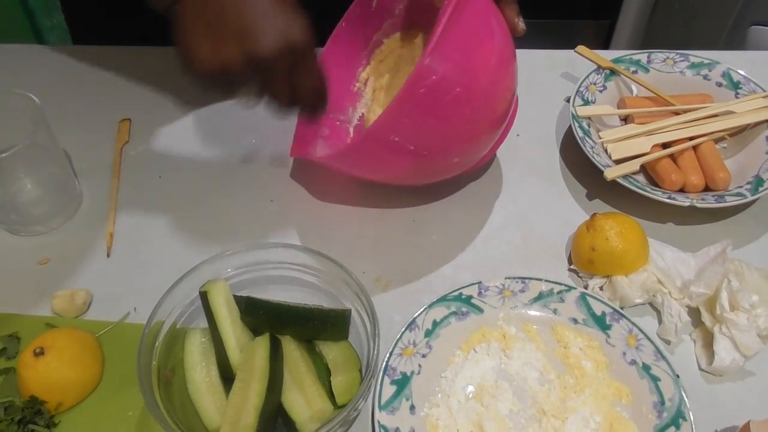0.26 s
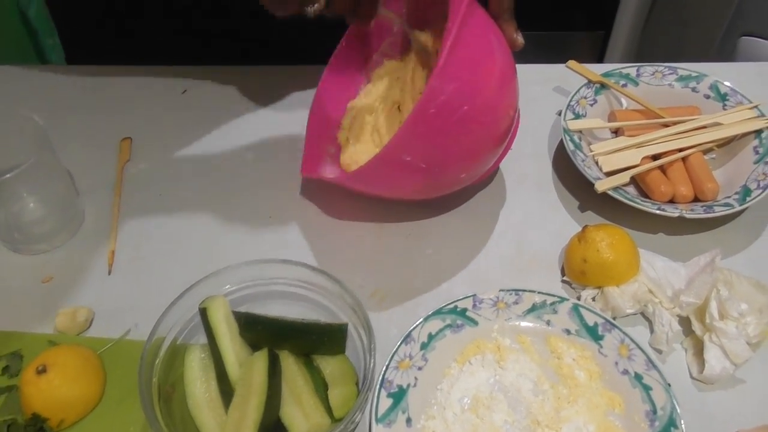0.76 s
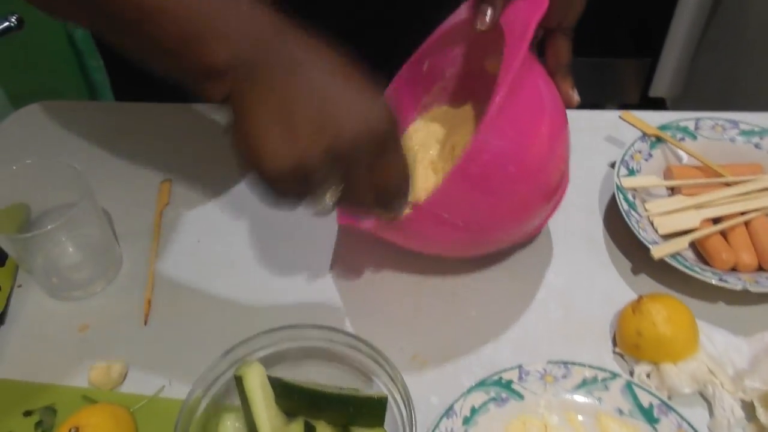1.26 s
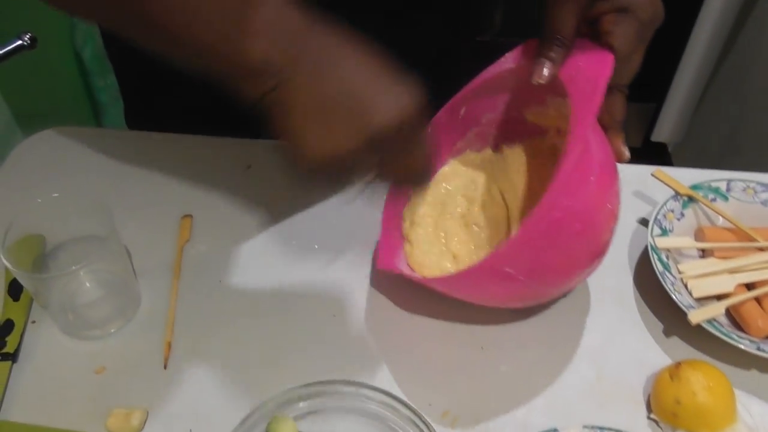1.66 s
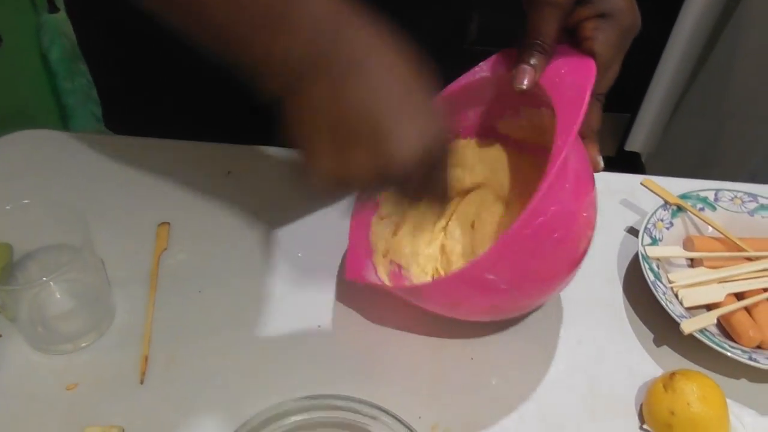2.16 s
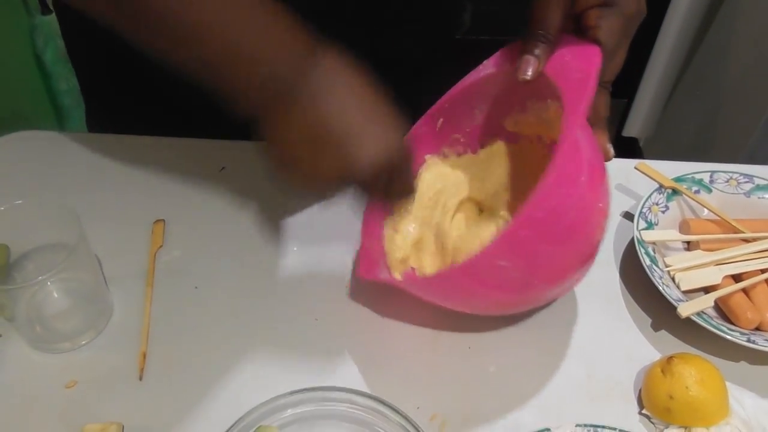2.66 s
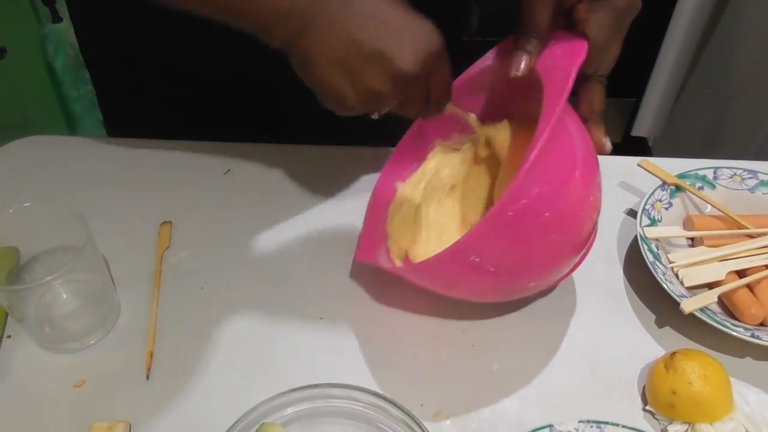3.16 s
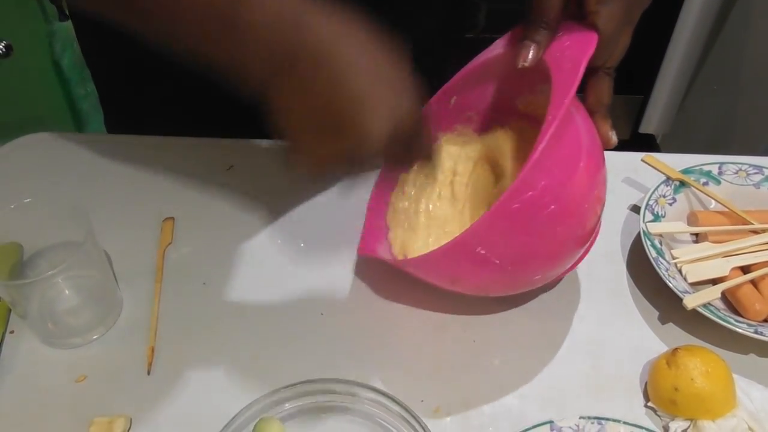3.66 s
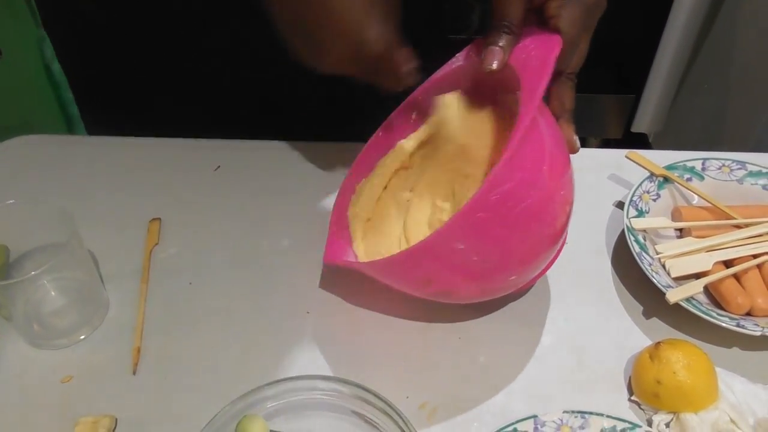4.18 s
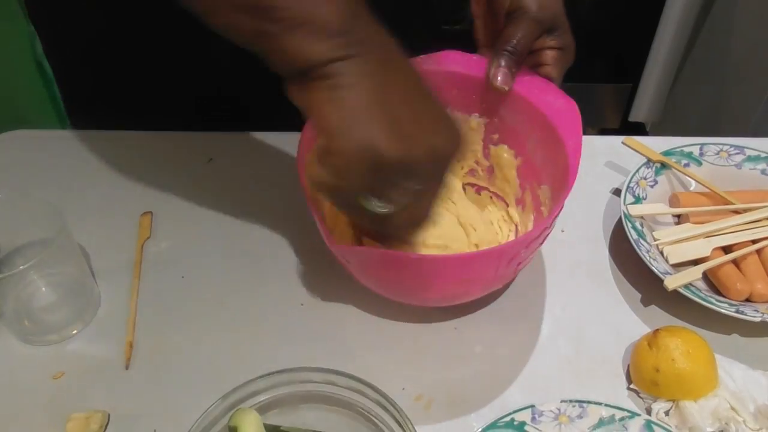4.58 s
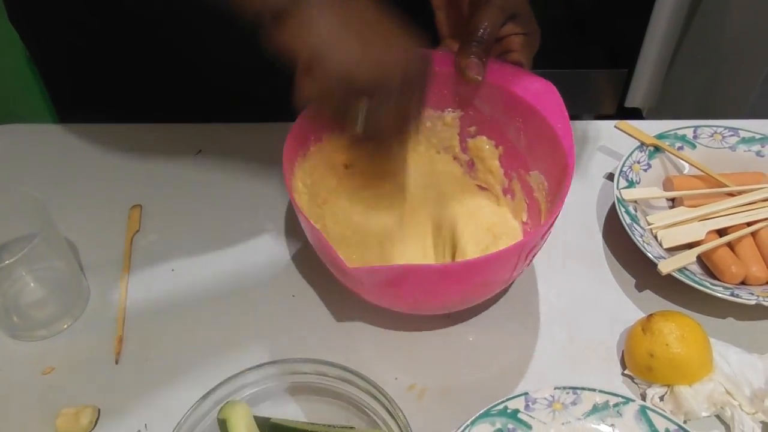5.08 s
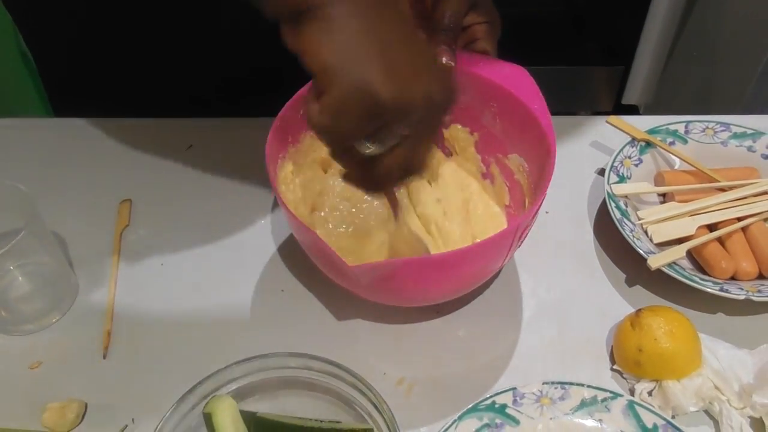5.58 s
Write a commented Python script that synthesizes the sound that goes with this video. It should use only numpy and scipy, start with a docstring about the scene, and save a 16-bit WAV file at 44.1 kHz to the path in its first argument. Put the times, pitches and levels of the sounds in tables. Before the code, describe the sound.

Rapid irregular fork strokes tick, rasp and thud against a batter-filled plastic bowl, growing harder and fuller toward the end.

```python
"""Beating batter with a fork

A metal fork beats thick batter in a thin plastic bowl held over a kitchen table, half a metre from a small
camera with two microphone ports. The tines tick and rasp on the wall: noise bursts and wet, gritty noise.
Blows and drags ring the batter-damped bowl as banks of decaying modes; hard hits add short pushes of air.
Dense echoes of the small kitchen smear it all, over a quiet room tone of filtered noise."""
import sys
import numpy as np
from scipy import signal
from scipy.fft import rfft, irfft
from scipy.io import wavfile

SR = 44100
rng = np.random.default_rng(int(sys.argv[2]) if len(sys.argv) > 2 else 0)


def write(x):
    x = np.atleast_2d(x).T
    wavfile.write(sys.argv[1], SR, np.round(np.clip(x, -1, 1) * 32767).astype(np.int16))

N = 256917
T = np.arange(N) / SR
HZ = np.maximum(np.arange(N // 2 + 1) * SR / N, 1)
LEFT_RIGHT = np.array([[1], [-1]])  # sign of a side signal in each channel


def undb(db):
    """Amplitude factor of a level in dB."""
    return 10 ** (np.asarray(db) / 20)


def unit(x):
    """Scale to rms 1."""
    return x / np.sqrt(np.mean(x ** 2))


def over_hz(table):
    """A (Hz, value) table read on a log axis at every frequency bin."""
    hz, value = np.transpose(table)
    return np.interp(np.log(HZ), np.log(np.maximum(hz, 1)), value)


def colour(x, gain):
    """Filter with unit power gain for white noise, so only the shape of the gain counts."""
    return irfft(rfft(x) * unit(gain), N)


def add(bus, start_s, burst):
    """Mix a burst into the bus, cut off at the end."""
    i = int(start_s * SR)
    bus[i:i + len(burst)] += burst[:N - i]


def fade(t60_s):
    """Exponential decay, cut at -40 dB."""
    t = np.arange(int(t60_s * SR * 2 / 3)) / SR
    return 1000. ** (-t / t60_s)


def swell(rise_ms, t60_s):
    """A smooth rise multiplied by an exponential decay."""
    decay = fade(t60_s)
    ms = np.arange(len(decay)) * 1000 / SR
    return decay * (1 - np.exp(-ms / rise_ms))


def hump(ms):
    """Smooth contact force of height 1."""
    return np.hanning(max(int(ms * SR / 1000), 6))


# Room tone of the small kitchen. Each row: frequency in Hz, relative noise density in dB per Hz.
ROOM_TONE = [(15, -34), (25, 17), (76, 4), (120, -32), (734, 0), (1610, -28), (3620, -38), (4870, -90),
             (16000, -32)]
ROOM_TONE_DB = -50.5


def kitchen():
    """Quiet room tone, mostly low rumble, with a little noise of opposite sign in the two channels."""
    gain = undb(over_hz(ROOM_TONE))
    mid = colour(rng.standard_normal(N), gain)
    side = colour(rng.standard_normal(N), gain)
    return undb(ROOM_TONE_DB) * (mid + 0.1 * side * LEFT_RIGHT)


def echoes(x, t60_s):
    """Dense decaying echoes of total energy 1, the first off the table after 3 ms."""
    tail = fade(t60_s)
    tail = rng.standard_normal(len(tail)) * tail / np.sqrt(np.sum(tail ** 2))
    delay = np.zeros(int(.003 * SR))
    return signal.fftconvolve(x, np.r_[delay, tail])[:N]


# Echoes that differ between the microphone ports. Each row: frequency in Hz, gain in dB.
APART = [(30, -36), (150, -14.5), (400, -15.5), (1000, -14), (3000, -20.5), (6000, -60), (9000, -9.5),
         (14000, -11)]
ROOM_DB, ROOM_T60_S, APART_T60_S = -12, 0.36, 0.1


def small_room(dry):
    """The small kitchen returns echoes, some common to both ports and some opposite in sign."""
    mid = dry + undb(ROOM_DB) * echoes(dry, ROOM_T60_S)
    side = irfft(rfft(echoes(mid, APART_T60_S)) * undb(over_hz(APART)), N)
    return mid + side * LEFT_RIGHT


def ring(force, modes):
    """Damped modes driven by a force, each a one-pole complex resonator."""
    out = 0
    for hz, db, t60_s in modes:
        pole = np.exp((2j * np.pi * hz - np.log(1000) / t60_s) / SR)
        out = out + undb(db) * signal.lfilter([1], [1, -pole], force).imag
    return out


def white_rms(modes):
    """Rms that unit white noise rings up in a bank of modes."""
    impulse = np.eye(1, SR // 4)[0]
    return np.sqrt(np.sum(ring(impulse, modes) ** 2))


# Low modes of the batter-filled belly. Each row: frequency in Hz, relative drive in dB, decay t60 in seconds.
BELLY = [(123.6, -7.5, 0.17), (193.2, -5.5, 0.2), (221.9, 1.5, 0.12), (275, -2.5, 0.042)]
# Higher modes of the plastic wall. Each row: frequency in Hz, relative drive in dB, decay t60 in seconds.
WALL = [(348, -7.5, 0.099), (442, 1.5, 0.03), (540.7, -0.5, 0.077), (635.7, 3.5, 0.057),
        (740.6, 5.5, 0.049), (808.7, -11, 0.16), (930, -3, 0.033), (1020, -13, 0.03), (1484, -24, 0.044)]


def bowl_drag(belly_db, wall_db):
    """The fork dragged through the batter keeps both banks of modes ringing with smooth noise."""
    out = 0
    for level_db, modes in ((belly_db, BELLY), (wall_db, WALL)):
        force = undb(level_db) * rng.standard_normal(N)
        out = out + ring(force, modes) / white_rms(modes)
    return out


SPOT_DB = 11.5  # most that a mode is favoured


def favour(modes, spot_hz, octaves):
    """Where the fork lands and how the batter lies favour the modes near one pitch."""
    favoured = []
    for hz, db, t60_s in modes:
        distance = np.log2(hz / spot_hz) / octaves
        favoured.append((hz, db + SPOT_DB * np.exp(-distance ** 2), t60_s))
    return favoured


def knock(modes, db, push, drag):
    """One short push sets the modes ringing, and the drag that follows it smears them."""
    blow = ring(np.pad(push, (0, len(drag) + SR // 8)), modes)
    smear = ring(np.pad(drag, (0, len(push) + SR // 8)), modes) / white_rms(modes)
    return undb(db) * (blow / np.abs(blow).max() + smear)


# Blows that ring the bowl. Each row: listed time in seconds (the blow sounds KNOCK_LAG_S later), peak of
# the wall modes in dB, peak of the belly modes in dB, favoured wall pitch in Hz, favoured belly pitch in Hz,
# drag on the wall after the blow in dB relative to that blow.
KNOCKS = [(.014, -24, -34, 785, 202, -13.5), (.1, -23, -29, 427, 234, 3), (.255, -20, -28, 550, 218, -13.5),
          (.389, -22, -32, 756, 185, -15), (.558, -12, -19.5, 766, 207, -18),
          (.588, -19.5, -28, 773, 188, -4.5), (.693, -19.5, -34, 570, 183, -9),
          (.746, -14.5, -24, 750, 190, -17), (.793, -18.5, -30, 530, 203, 0),
          (.964, -10.5, -33, 620, 213, -3), (1.0, -14, -24, 734, 214, -6.5),
          (1.094, -21, -34, 754, 210, -11), (1.163, -18, -33, 756, 186, -6.5),
          (1.2, -9.5, -38, 770, 230, -6), (1.295, -25, -31, 751, 214, -4.5),
          (1.378, -24, -20.5, 775, 193, 3), (1.403, -10.5, -29, 730, 191, -2.5),
          (1.575, -25, -23.5, 633, 188, -8), (1.621, -13, -32, 466, 199, -2),
          (1.76, -24, -29, 670, 183, -8), (1.913, -17.5, -25, 397, 229, -20),
          (1.989, -21.5, -21, 420, 196.4, -9), (2.055, -40, -27, 444, 213, -9),
          (2.086, -31, -22.5, 773, 220, -6), (2.214, -27, -21.5, 740, 205, -1.5),
          (2.314, -22, -18, 455, 201, -6), (2.446, -36, -40, 506, 205, -24),
          (2.519, -6.5, -15.5, 556, 215, -7.5), (2.658, -22, -25, 765, 199, -2),
          (2.746, -9, -17.5, 430, 198, -8.5), (2.856, -9, -32, 740, 258, -10),
          (2.865, -28, -38, 640, 175, -14), (2.93, -14, -33, 760, 192, -4.5),
          (2.963, -7.5, -14, 396, 186, -10), (3.085, -18.5, -29, 617, 166, -20),
          (3.125, -26.5, -24, 740, 190, 1.5), (3.187, -11, -24, 510, 216, -10.5),
          (3.299, -23.5, -39, 939, 221, -6.5), (3.34, -16.5, -33, 522, 192, -7.5),
          (3.399, -10, -23, 520, 197, -10.5), (3.512, -24, -28.5, 937, 198, -6),
          (3.579, -14.5, -25, 520, 231, -7), (3.614, -8, -28, 500, 190, -13.5),
          (3.738, -25, -33, 750, 194, -2), (3.794, -14, -23.5, 745, 198, -1.5),
          (4.008, -34, -21.5, 680, 212, -7), (4.047, -28, -22.5, 748, 222, -13),
          (4.174, -31, -43, 560, 220, 4.5), (4.309, -31.5, -32, 750, 212, 0),
          (4.417, -39, -28, 759, 241, -9), (4.443, -33, -16.5, 530, 191, -19),
          (4.514, -13, -28, 549, 229, -11), (4.611, -33, -14, 646, 221, -13),
          (4.65, -21, -16.5, 615, 226, 0.5), (4.851, -25, -18.5, 616, 161, -1.5),
          (4.926, -26, -21, 520, 191, -9), (4.953, -3, -24, 885, 223, -16),
          (5.071, -21, -13, 520, 203, -7.5), (5.134, -9, -23, 520, 229, -13.5),
          (5.161, -4.5, -31, 880, 229, -10.5), (5.354, -5, -7.5, 503, 208, -16.5),
          (5.412, -18, -25, 550, 186, -8), (5.619, -16, -21, 406, 176, -23), (5.644, -4, -11, 527, 210, -6),
          (5.705, -17.5, -19, 581, 174, -7)]
PUSH_MS, KNOCK_RISE_MS, DRAG_T60_S = 1.29, 6.9, 0.18
BELLY_DRAG_DB = -7  # relative to the blow
BELLY_OCTAVES, WALL_OCTAVES = 0.17, 0.44  # width of the favoured region
KNOCK_LAG_S = 0.00149  # constant offset from the listed time to the sounding blow or thump


def blows():
    """Each blow strikes belly and wall modes, then drags on with noise that swells and dies."""
    out = np.zeros(N)
    belly_noise, wall_noise = rng.standard_normal((2, N + SR))
    push, ease = hump(PUSH_MS), swell(KNOCK_RISE_MS, DRAG_T60_S)
    for s, wall_db, belly_db, wall_hz, belly_hz, wall_drag_db in KNOCKS:
        span = slice(int(s * SR), int(s * SR) + len(ease))
        belly_drag = undb(BELLY_DRAG_DB) * ease * belly_noise[span]
        wall_drag = undb(wall_drag_db) * ease * wall_noise[span]
        belly = favour(BELLY, belly_hz, BELLY_OCTAVES)
        wall = favour(WALL, wall_hz, WALL_OCTAVES)
        add(out, s + KNOCK_LAG_S, knock(belly, belly_db, push, belly_drag))
        add(out, s + KNOCK_LAG_S, knock(wall, wall_db, push, wall_drag))
    return out


# Hard hits that shove air directly. Each row: listed time in seconds (the push of air sounds KNOCK_LAG_S
# later), peak in dB, length of the push in ms.
THUMPS = [(0.588, -2.5, 1.13), (0.694, -3, 1.2), (2.446, -3, 1.08), (2.659, -13, 1.9), (2.866, -4.5, 1.2),
          (3.084, -2, 0.96), (3.184, -14, 1.2), (3.299, -19.5, 2), (4.952, -17, 2.9), (5.162, -5, 1.37),
          (5.354, -4, 1.24), (5.643, 2.5, 1.35)]


def thumps():
    """The wall gives way under a hard hit and pushes out one smooth pulse of air."""
    out = np.zeros(N)
    for s, db, ms in THUMPS:
        add(out, s + KNOCK_LAG_S, undb(db) * hump(ms))
    return out


RADIATES_HZ = 115


def bowl(belly_db, wall_db):
    """Ringing modes, weak at the bottom as a small bowl radiates little below its lowest mode, and thumps."""
    highpass = signal.butter(4, RADIATES_HZ, "high", fs=SR)
    return signal.lfilter(*highpass, bowl_drag(belly_db, wall_db) + blows()) + thumps()


GRAINS_PER_S, GRAIN_SPREAD_DB, GRAIN_MS = 600, 3, 6.4


def grit():
    """Noise roughened by tiny slips of very uneven size; rms 1."""
    sizes = undb(GRAIN_SPREAD_DB * rng.exponential(size=N))
    slips = (rng.random(N) < GRAINS_PER_S / SR) * sizes
    roughness = 1.02 + np.convolve(slips, hump(GRAIN_MS), "same")
    return unit(rng.standard_normal(N) * roughness)


def wet(edges_hz):
    """Squelch: every band slips and smears on its own; rms 1."""
    spectrum = 0
    for low, high in zip(edges_hz[:-1], edges_hz[1:]):
        spectrum = spectrum + rfft(grit()) * ((HZ >= low) & (HZ < high))
    return unit(irfft(spectrum, N))


SQUISH_Q, SQUISH_DB = 7.2, 1


def squish(x, hz):
    """A pocket in the batter lifts one band."""
    return x + undb(SQUISH_DB) * signal.lfilter(*signal.iirpeak(hz, SQUISH_Q, fs=SR), x)


SCRAPE_T60_S = 0.11


def stroke(rise_s, fall_s, start_db, lift_db):
    """Pressure builds to its peak, eases until the fork lifts, then the batter lets go."""
    t = np.arange(-rise_s, fall_s, 1 / SR)
    held_db = np.interp(t, [-rise_s, 0, fall_s], [start_db, 0, lift_db])
    return np.r_[undb(held_db), undb(lift_db) * fade(SCRAPE_T60_S)]


# Tines meeting the wall. Each row: start in seconds, level of the bright part in dB before the rasp colour,
# dull part (below 5 kHz) in dB relative to the bright one, pocket frequency in Hz, contact time in ms.
TICKS = [(0.0746, -19.5, -11, 1590, 1.4), (0.1321, -28.5, 14, 3600, 3.4), (.255, -25, -15, 1440, 1.6),
         (0.2996, -22.5, -1.5, 4160, 3.1), (0.3539, -15, -6, 3700, 0.73), (0.396, -24.5, 11.5, 1580, 3.4),
         (.49, -20.5, -1, 4200, 3), (0.5622, -16.5, 11, 1430, 1.2), (0.588, -19, 0, 2570, 4.8),
         (0.6937, -15, 6, 1470, 5.4), (.7755, -16, -10, 1980, 2.4), (0.7951, -18.5, 4.5, 1510, 3.7),
         (0.8988, -10.5, -5.5, 4410, 1.8), (0.9706, -17.5, 11, 1460, 1.7), (0.9848, -13, -26, 3000, 5.5),
         (0.9988, -13, 4.5, 1480, 2.4), (1.099, -19.5, -20, 4780, 2.6), (1.174, -12, -1.5, 2700, 2.2),
         (1.199, -27, 8.5, 1400, 2.6), (1.2946, -18.5, -0.5, 3730, 4.8), (1.3809, -9, -10, 2960, 1.1),
         (1.4014, -18, -12, 2900, 1.4), (1.5922, -20, 0, 4360, 3.7), (1.6254, -22.5, 12, 1530, 2.4),
         (1.7642, -25.5, 7.5, 2460, 1.8), (1.7953, -14, -27, 4710, 2.1), (1.8266, -22, -14, 2780, 2.7),
         (1.9045, -25, 7, 2800, 1.4), (1.956, -28, -7, 3580, 4.6), (1.9859, -16.5, -0.5, 3220, 5.7),
         (2.018, -17.5, -19, 4140, 2.9), (2.0739, -29, 11, 4200, 7.7), (2.1224, -22.5, -12, 1710, 2.1),
         (2.2163, -32, -10, 2460, 5.3), (2.3254, -16.5, -8.5, 1820, 2), (2.3406, -20, -11, 2860, 3.6),
         (2.447, -8, -2, 1900, 4.2), (2.538, -22, -1, 2310, 2), (2.658, -13.5, 0.5, 4000, 6.2),
         (2.749, -23, 2, 3500, 4.2), (2.8681, -10, 4, 1910, 2.5), (2.9651, -15, 3, 3700, 1.8),
         (3.0846, -7.5, -2, 1540, 4.8), (3.1662, -18.5, 2, 2100, 3.4), (3.1873, -17.5, -1, 1450, 3),
         (3.2985, -9.5, -2, 3500, 3.5), (3.3767, -17.5, -18, 3240, 2), (3.4, -18, 9.5, 1510, 2.3),
         (3.512, -5.5, -3, 1570, 1.77), (3.6124, -13.5, -1.5, 1340, 4.6), (3.6823, -43, 19.5, 2660, 2.7),
         (3.7398, -11, 0, 3470, 2.4), (4.0573, -29, -5, 4030, 2.5), (4.1148, -26, 6, 1470, 1.1),
         (4.1632, -25, -10, 1430, 5.7), (4.2668, -34, 16.5, 3270, 2.2), (4.311, -30, 12.5, 1980, 4),
         (4.354, -20, -15, 3920, 1.9), (4.443, -31, 10, 3300, 2.8), (4.5135, -16.5, 3.5, 3420, 3.4),
         (4.571, -17, -18, 3980, 2.2), (4.718, -20.5, 3, 3300, 10.7), (4.9541, -11.5, 5.5, 1310, 2.1),
         (5.0545, -21.5, -12, 4750, 3), (5.1348, -18.5, 0, 2010, 4.4), (5.161, -15, 5, 1800, 5.3),
         (5.3032, -22.5, 2, 4120, 5.2), (5.355, -21.5, 8, 3820, 1.8), (5.4115, -11, 5.5, 4650, 1.53),
         (5.6028, -20.5, 1.5, 4200, 2.1), (5.6821, -14, -1, 4130, 1.2), (5.7043, -18, 8, 1600, 2)]
TICK_RISE_MS, TICK_T60_S, TICK_TAIL_DB = 1.5, 0.053, -17.5


def ticks(dull):
    """Short cracks of noise under a contact hump with a weak tail; the dull ones open a pocket."""
    out, noise = np.zeros(N), rng.standard_normal(N + SR)
    for s, db, dull_db, pocket_hz, ms in TICKS:
        shape = undb(TICK_TAIL_DB) * swell(TICK_RISE_MS, TICK_T60_S)
        contact = hump(ms)
        shape[:len(contact)] += contact / 2
        burst = noise[int(s * SR):][:len(shape)]
        burst = shape * burst / np.sqrt(np.average(burst ** 2, weights=shape ** 2))
        if dull:
            add(out, s, undb(db + dull_db) * squish(burst, pocket_hz))
        else:
            add(out, s, undb(db) * burst)
    return out


# Wet scrapes along the wall. Each row: loudest moment in seconds, rise in seconds, fall in seconds,
# hiss above 5 kHz in dB, squelch below it in dB, both at the loudest moment before the rasp colour.
SCRAPES = [(0.135, 0.024, 0.046, -34.5, -35), (.256, 0.0046, 0.049, -33, -46.5),
           (0.352, 0.014, 0.072, -35, -37.5), (.491, 0.011, 0.021, -31, -37),
           (.577, 0.03, 0.024, -31.5, -32), (.782, .022, .02, -28, -29), (.896, 0.0042, 0.014, -33, -35.5),
           (0.989, 0.028, 0.027, -35, -35), (1.098, 0.0062, 0.02, -39.5, -45.5),
           (1.186, 0.022, 0.011, -23, -27), (1.401, 0.026, 0.01, -24.5, -27.5),
           (1.516, 0.026, 0.01, -30, -38), (1.604, 0.025, 0.015, -24.5, -30.5),
           (1.744, 0.0035, .015, -33, -50), (1.824, 0.07, 0.14, -38.5, -50.5),
           (2.023, 0.028, .014, -27.5, -39), (2.118, 0.056, 0.21, -48.5, -48.5),
           (2.223, 0.0065, 0.017, -27.5, -37.5), (2.336, .016, 0.049, -33.5, -41),
           (2.548, 0.043, 0.02, -32.5, -37.5), (2.751, 0.0072, 0.031, -35, -38),
           (2.868, 0.0096, 0.0086, -36, -36), (2.91, 0.054, 0.39, -46.5, -40.5),
           (3.19, 0.038, .012, -33, -32.5), (3.385, 0.023, 0.053, -38.5, -38.5),
           (3.614, 0.038, .012, -44, -34), (3.828, 0.041, 0.07, -38.5, -40.5),
           (4.075, 0.08, 0.044, -41, -49), (4.115, .012, 0.11, -38.5, -48), (4.359, 0.14, 0.018, -38, -50),
           (4.51, 0.079, 0.016, -33.5, -38), (4.594, 0.038, 0.028, -31, -43.5),
           (4.727, 0.043, 0.026, -24.5, -29.5), (4.865, 0.076, 0.019, -35.5, -40.5),
           (4.931, 0.0073, 0.018, -30, -36), (4.951, .005, 0.0063, -39, -53),
           (5.06, 0.0065, 0.04, -35.5, -42.5), (5.14, 0.0087, 0.022, -30.5, -31),
           (5.164, 0.022, 0.017, -33, -35), (5.304, 0.0055, 0.069, -43, -48),
           (5.395, 0.015, 0.033, -26.5, -29), (5.518, .006, 0.0073, -37.5, -39.5),
           (5.596, 0.0037, 0.0079, -34, -54), (5.643, 0.039, 0.006, -30.5, -33),
           (5.682, 0.0091, .025, -21.5, -33), (5.712, 0.013, 0.016, -34, -30.5)]
# Start and lift of a stroke in dB relative to its loudest moment
HISS_START_DB, HISS_LIFT_DB, SQUELCH_START_DB, SQUELCH_LIFT_DB = -19.5, -17.5, -12, -12.5


def scrapes(squelch, dull):
    """Changing pressure shapes the wet noise; the dull part takes the pocket of the nearest tick."""
    out, padded = np.zeros(N), np.r_[squelch, np.zeros(SR)]
    for s, rise_s, fall_s, hiss_db, squelch_db in SCRAPES:
        if dull:
            pressure = undb(squelch_db) * stroke(rise_s, fall_s, SQUELCH_START_DB, SQUELCH_LIFT_DB)
        else:
            pressure = undb(hiss_db) * stroke(rise_s, fall_s, HISS_START_DB, HISS_LIFT_DB)
        smear = pressure * padded[int((s - rise_s) * SR):][:len(pressure)]
        if dull:
            nearest = min(TICKS, key=lambda tick: abs(tick[0] - s))
            smear = squish(smear, nearest[3])
        add(out, s - rise_s, smear)
    return out


# Colour of the tines on the wall. Each row: frequency in Hz, relative density in dB per Hz.
RASP = [(710, 34.5), (1200, 7), (1310, 0.5), (1440, 0.5), (1680, -3), (2000, -0.5), (3010, -2), (3510, 0),
        (5130, -0.5), (6650, 7), (8440, 4.5), (14000, -11), (16000, -18)]
# Edges in Hz of the bands that slip on their own
WET_HZ = [1200, 1900, 3000, 5000, 7500, 11000, 17000]
DRAG_DULL_DB = 2.5  # dull part of the steady rasp relative to the bright part


def tines(rasp_db):
    """Steady rasp, scrapes and cracks, in a bright part above 5 kHz and a dull part below."""
    bright_gain = 1 / (1 + (5000 / HZ) ** 6)
    dull_gain = (1 - bright_gain) / (1 + (1100 / HZ) ** 6)
    bright_squelch, dull_squelch = wet(WET_HZ[2:]), wet(WET_HZ[:5])
    bright = undb(rasp_db) * bright_squelch + scrapes(bright_squelch, False) + ticks(False)
    dull = undb(rasp_db + DRAG_DULL_DB) * dull_squelch + scrapes(dull_squelch, True) + ticks(True)
    rasp = undb(over_hz(RASP))
    return colour(bright, rasp * bright_gain) + colour(dull, rasp * dull_gain)


# Fork dragged through the batter between the strokes. Each row: time in seconds, bright rasp in dB before
# its colour, belly modes in dB, wall modes in dB.
DRAG = [(0.0, -51.5, -50, -53.5), (.15, -53, -44, -37.5), (.6, -58, -46, -42), (1.2, -56.5, -50, -44),
        (1.6, -60.5, -46, -41.5), (2.0, -52, -43.5, -45.5), (2.4, -54.5, -39.5, -41.5),
        (2.8, -52.5, -37.5, -40.5), (3.3, -62, -39.5, -56), (3.75, -55.5, -49, -45), (3.95, -61, -49, -60),
        (4.1, -67, -43.5, -39), (4.3, -49.5, -51.5, -54.5), (4.46, -53, -24, -29), (4.57, -51, -21.5, -34),
        (4.66, -57, -28, -30.5), (4.95, -66, -35.5, -37.5), (5.4, -54.5, -36, -38), (5.6, -67, -42, -47.5),
        (5.83, -54.5, -32, -37)]


def scene():
    """Fork and bowl in the small kitchen, over its room tone."""
    s, *columns = np.transpose(DRAG)
    rasp_db, belly_db, wall_db = (np.interp(T, s, column) for column in columns)
    dry = tines(rasp_db) + bowl(belly_db, wall_db)
    return small_room(dry) + kitchen()


# Level between the microphone ports. Each row: frequency in Hz, left minus right in dB.
PORT_DB = [(60, 0.5), (110, 1.5), (200, 0.5), (380, -4.5), (700, -3), (1290, -1), (2380, -0.5), (4400, 0.5),
           (8120, -1), (15000, -1)]
# Phase between the microphone ports. Each row: frequency in Hz, lead of the left in radians.
PORT_RAD = [(0, -1.4), (260, -0.2), (860, 0.61), (2330, 0.16), (9130, -0.079), (10600, 0.86), (12700, 1),
            (15400, 0.99), (16100, 0.0)]
TOP_HZ = 16000


def record(dry):
    """Two close microphone ports differ a little in level and phase; peaks are clipped, the top is cut."""
    port = undb(over_hz(PORT_DB) / 2) * np.exp(.5j * over_hz(PORT_RAD))  # half the difference to each port
    left = irfft(rfft(dry[0]) * port, N)
    right = irfft(rfft(dry[1]) / port, N)
    clipped = np.clip(np.array([left, right]), -1, 1)
    lowpass = signal.ellip(8, .2, 70, TOP_HZ, fs=SR, output="sos")
    return signal.sosfilt(lowpass, clipped)


dry = scene()
out = record(dry)
write(out)
```